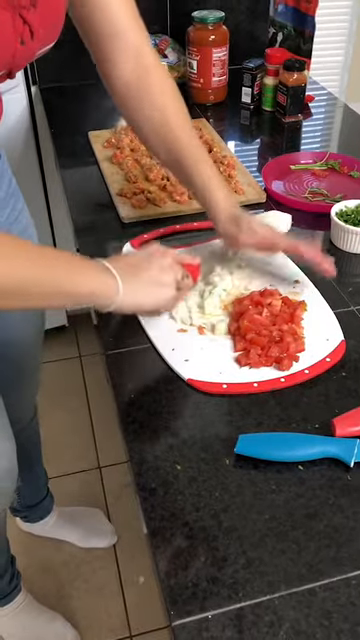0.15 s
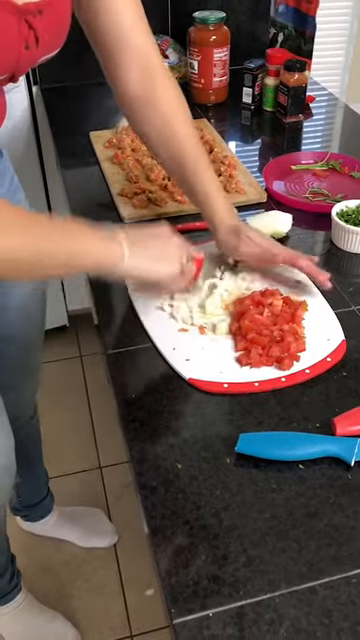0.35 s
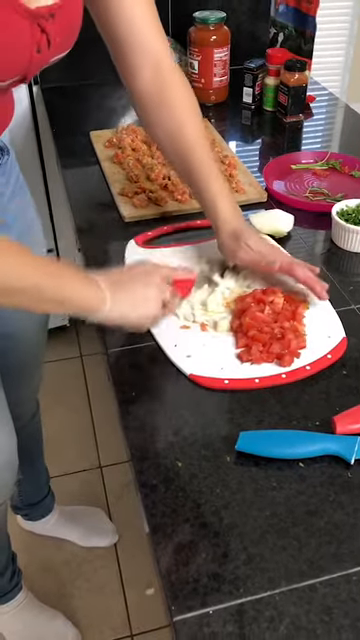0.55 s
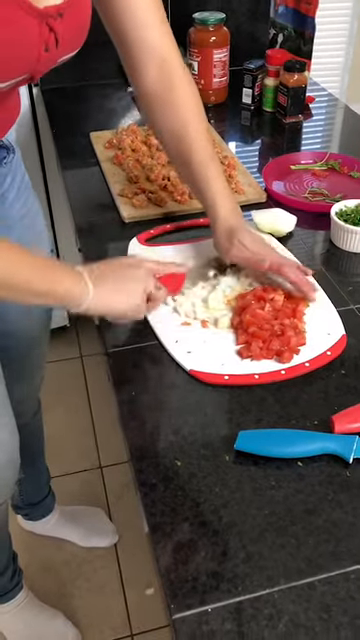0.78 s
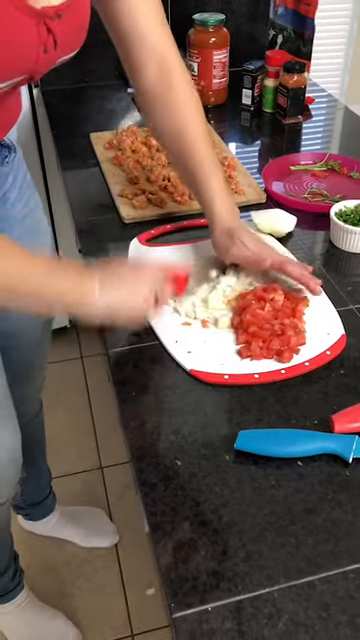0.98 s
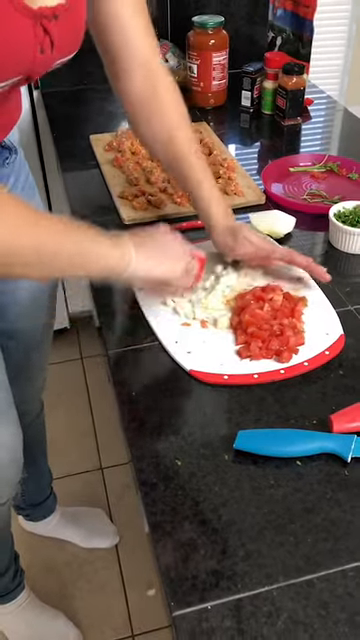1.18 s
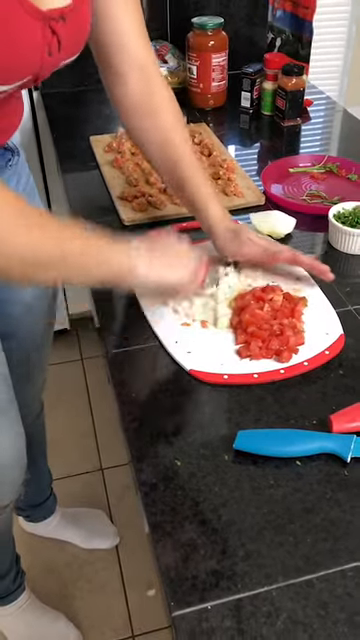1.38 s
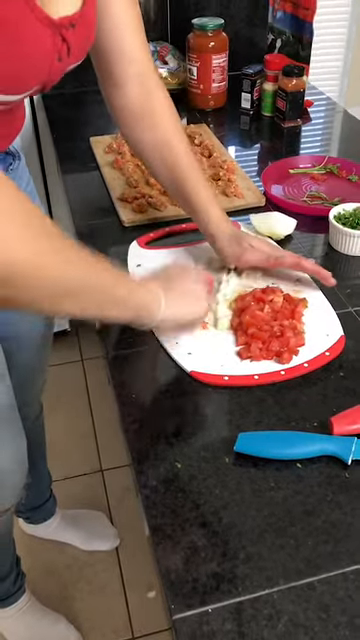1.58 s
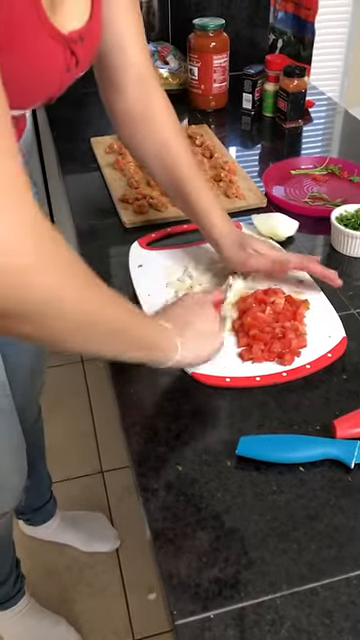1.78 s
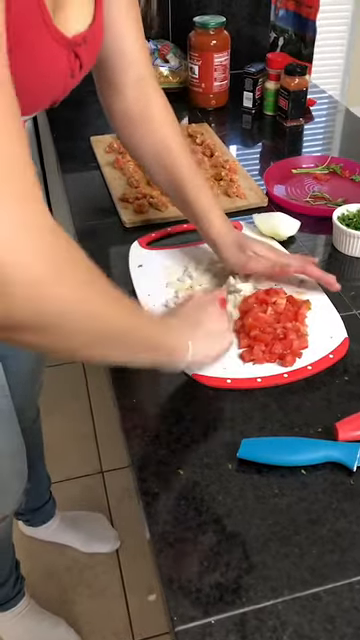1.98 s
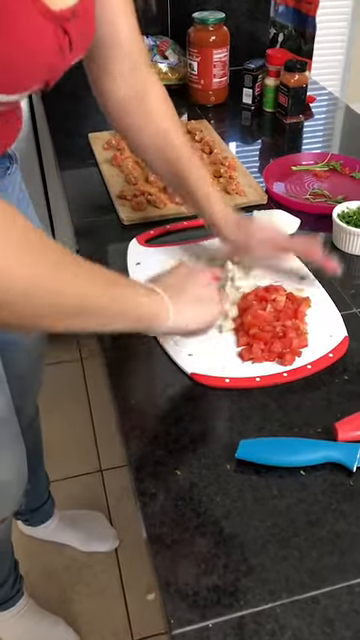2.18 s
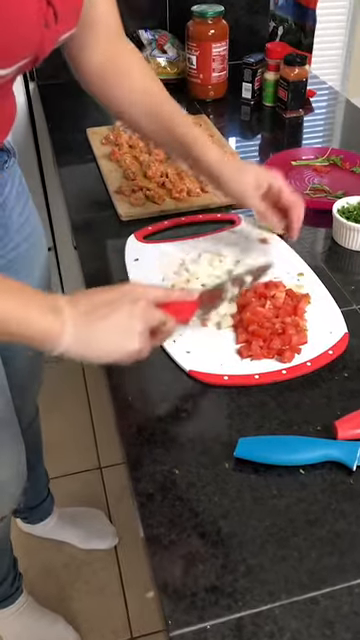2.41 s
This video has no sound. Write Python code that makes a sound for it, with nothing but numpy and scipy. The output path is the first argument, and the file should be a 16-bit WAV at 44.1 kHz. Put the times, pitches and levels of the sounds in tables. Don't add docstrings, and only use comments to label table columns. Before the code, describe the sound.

Onion is cut in crunchy strokes about four a second, the blade tapping hollow plastic, with the loudest knock near the end. Phone microphone about a metre away, short live room echo, steady fridge rumble underneath.

```python
import sys
import numpy as np
from scipy import signal
from scipy.fft import rfft, irfft
from scipy.io import wavfile
from scipy.ndimage import uniform_filter1d

SR = 44100
rng = np.random.default_rng(int(sys.argv[2]) if len(sys.argv) > 2 else 0)


def to_linear_factor(level_db):
    exponent = np.asarray(level_db, float) / 20
    return 10 ** exponent


def to_wav(s):
    ch = np.atleast_2d(s).T
    pcm = np.round(np.clip(ch, -1, 1) * 32767)
    wavfile.write(sys.argv[1], SR, pcm.astype(np.int16))


N = 108045
T = np.arange(N) / SR


def unit(x):
    return x / np.sqrt(np.mean(x ** 2))


def shade(x, table):
    hz, db = np.array(table, float).T
    f = np.arange(len(x) // 2 + 1) * SR / len(x) + 1
    gain = to_linear_factor(np.interp(np.log(f), np.log(hz), db))
    return irfft(rfft(x) * gain, len(x))


def ring(x, hz, width, times=1):
    for _ in range(times):
        x = signal.lfilter(*signal.iirpeak(hz, hz / width, fs=SR), x)
    return x


def modes(x, table):
    return sum((-1) ** k * to_linear_factor(db) * ring(x, hz, width) for k, (hz, width, db) in enumerate(table))


def walk(rate):
    k = int(SR / rate)
    targets = rng.standard_normal(N // k + 1)
    return unit(uniform_filter1d(np.repeat(targets, k), k)[:N])


def fridge():
    # frequency in Hz, level in dB per Hz.
    rumble_colour = [(18, -52), (30, -6.5), (227, -1.5), (1040, -14), (1160, -12.5), (1250, -14.5),
                     (1670, -19.5), (14400, -41.5), (16000, -40)]
    # pitch in Hz, width in Hz, level in dB.
    motor = [(65.2, 8.7, -64), (154.8, 16.4, -58.5), (298.2, 3.8, -65.5), (472.7, 9.6, -68)]
    rumble_db, drift_db_ratio, drift_hz = -53.5, 0.87, 3.83
    hum = sum(to_linear_factor(db) * unit(ring(rng.standard_normal(N), hz, width)) for hz, width, db in motor)
    rumble = unit(shade(rng.standard_normal(N), rumble_colour))
    return to_linear_factor(rumble_db) * rumble * to_linear_factor(drift_db_ratio * walk(drift_hz)) + hum


def touches():
    # start in seconds, length in seconds, level in dB, pitch in Hz, width in Hz.
    contacts = [(0.1145, .002, -57.5, 10600, 9000), (0.121, 0.014, -69, 9900, 8000),
                (0.205, 0.0016, -68, 13000, 6000), (.209, .0015, -53, 9900, 5000),
                (0.235, 0.0016, -36.5, 7060, 6000), (0.253, 0.0033, -48, 8200, 6000),
                (.501, 0.0045, -52, 10700, 7000), (0.507, 0.0011, -46, 4940, 6000),
                (0.76, 0.0018, -64, 12000, 6000), (0.768, 0.0022, -56, 8000, 12000),
                (.77, 0.0067, -49, 1770, 2000), (.827, 0.0022, -43, 7000, 5000),
                (1.033, .01, -51.5, 9000, 14000), (1.1045, 0.0016, -56, 8040, 5000),
                (1.265, 0.0049, -60, 7900, 11900), (1.294, 0.001, -40, 8800, 3960),
                (1.672, .035, -56.5, 10900, 6000), (1.678, 0.03, -55, 2400, 1300),
                (1.784, 0.0045, -45.5, 6750, 4000), (1.547, .03, -48, 4600, 2500),
                (1.984, 0.017, -66, 10900, 8000), (2.187, 0.0018, -56.5, 10000, 4000)]
    out, size = np.zeros(N), 4096
    for s, length, db, hz, width in contacts:
        grit = rng.standard_normal(size) ** 3
        shape = np.sqrt(np.sin(np.pi * np.clip(T[:size] / length, 0, 1)).clip(0))
        start = int(s * SR)
        out[start:start + size] += to_linear_factor(db) * unit(ring(grit, hz, width, times=2)) * shape
    return out


def cells(patch):
    cells_per_s, scatter_db, patchy_db = 7000, 2.5, 2
    on = rng.random(N) < cells_per_s / SR
    size = to_linear_factor(scatter_db * rng.exponential(size=N) + patchy_db * patch)
    return unit(on * rng.standard_normal(N) * size)


def stroke(column):
    # start, swell and hold in seconds, crunch in dB, board shake in dB.
    cuts = [
        (0.218, 0.021, 0.026, -46.5, -44.5),
        (0.506, 0.027, 0.023, -43.5, -41),
        (0.78, 0.0066, 0.031, -49, -46.5),
        (0.797, 0.014, 0.028, -46, -55),
        (1.026, 0.014, 0.03, -46.5, -48.5),
        (1.109, 0.0046, 0.0088, -54, -62),
        (1.268, 0.0091, 0.023, -40.5, -46),
        (1.536, 0.011, 0.027, -46.5, -49.5),
        (1.769, 0.019, 0.035, -46, -48),
        (1.992, 0.024, 0.046, -43.5, -43),
    ]
    release_s = 0.0068
    out = np.zeros(N)
    for row in cuts:
        start, swell, hold = row[:3]
        t = T - start
        rise = np.clip(t / swell, 0, 1) ** 1.42
        release = np.exp(-np.clip(t - swell - hold, 0, 1) / release_s)
        out = np.hypot(out, to_linear_factor(row[column]) * rise * release)
    return out


def onion():
    # frequency in Hz, level in dB.
    crunch_colour = [(1500, 9), (2600, -7.5), (4000, -0.5), (7000, -2), (12000, -5), (15000, -2),
                     (16000, -23)]
    # pitch in Hz, width in Hz, level in dB.
    board = [(786, 144, 3.5), (1010, 154, 8.5), (1200, 170, 0.5), (1500, 240, -8), (2000, 740, -6),
             (3240, 240, -12.5)]
    drift_db, drift_hz, cell_q = 1.84, 29.75, 2.8
    hz, db = np.array(crunch_colour, float).T
    patch = walk(200)
    crunch = np.zeros(N)
    for f in np.geomspace(1500, 15000, 11):
        level = np.interp(np.log(f), np.log(hz), db) + drift_db * walk(drift_hz)
        crunch += to_linear_factor(level) * ring(cells(patch), f, f / cell_q)
    force = cells(walk(200))
    shake = modes(force * stroke(column=4), board) / np.std(modes(force, board))
    return unit(crunch) * stroke(column=3) + shake


def burst(decay_s, size):
    x = ring(rng.standard_normal(size), 6200, 13000) * np.exp(-T[:size] / decay_s)
    return x / np.abs(x).max()


def knocks():
    # start in seconds, peak in dB, ring pitch in Hz, upper modes in dB, crack in dB.
    hits = [(.2285, -36, 945, -20, -20), (0.2434, -32, 1024, -15, -23), (0.2522, -34, 1200, 6, -20),
            (0.2551, -32.5, 1250, -12, -22), (0.2674, -32.5, 804, -25, -18), (0.5433, -30.5, 1010, -2, -20),
            (.5537, -26, 1107, -1.5, -26), (0.5568, -32.5, 1130, -30, -16), (0.784, -36.5, 1500, -10, -24),
            (0.8187, -38.5, 940, -8, -24), (1.0518, -29, 1050, -23, 0), (1.0559, -31.5, 1040, -10, -3),
            (1.0663, -34.5, 1050, -19, -18), (1.2766, -25, 1010, -8, -35), (1.563, -34.5, 1110, -3, -17),
            (1.7881, -35, 1174, 3.5, -23), (1.808, -42, 1940, 11, -10), (1.8152, -27, 1070, 3, -28),
            (1.811, -32.5, 2040, -5, -24), (1.8211, -36, 1700, -3, -24), (2.0149, -24, 1160, -5, -14),
            (2.0175, -33, 400, -18, -24), (2.0489, -18.5, 1140, -0.5, 2), (2.0541, -27, 1200, -17, -27)]
    # pitch in Hz, width in Hz, level in dB.
    upper_modes = [(2060, 1000, 14), (2700, 200, 5), (2910, 220, 11), (4100, 2700, 5)]
    ring_width_hz, ring_lag_s, crack_s = 687, 0.0005, 0.00054
    thud_hz, thud_width_hz, thud_db = 330, 335, -23.5
    out, size = np.zeros(N), 1024
    tap = signal.unit_impulse(size)
    late_tap = np.roll(tap, int(ring_lag_s * SR))
    upper = modes(tap, upper_modes)
    thud = ring(tap, thud_hz, thud_width_hz, times=2)
    for s, db, hz, upper_db, crack_db in hits:
        low = ring(late_tap, hz, ring_width_hz, times=3)
        hit = low / low.max() + to_linear_factor(upper_db) * upper / upper.max()
        hit += to_linear_factor(crack_db) * burst(crack_s, size) + to_linear_factor(thud_db) * thud / thud.max()
        start = int(s * SR)
        out[start:start + size] += to_linear_factor(db) * hit
    return out


def kitchen(x):
    # band centre in Hz, time to fall 60 dB in seconds.
    decay = [(300, 0.53), (1000, 0.6), (2000, 0.47), (4000, 0.55), (8000, 0.34), (14000, 0.12)]
    # band centre in Hz, level in dB.
    colour = [(300, -2.5), (1000, -3.5), (2000, -1), (4000, -5.5), (8000, -2.5), (14000, 2)]
    tail_db, gap_s, flutter_db = -7, 0.0044, 2.5
    early_s, early_db = 0.023, -15.5
    t = T[:SR]
    tail = np.zeros(SR)
    for (hz, t60), (_, db) in zip(decay, colour):
        band = ring(rng.standard_normal(SR), hz, 0.92 * hz)
        tail += to_linear_factor(db) * band * 1000. ** (-t / t60) * to_linear_factor(flutter_db * walk(40)[:SR])
    early = rng.standard_normal(SR) * np.exp(-t / early_s)
    echo = to_linear_factor(tail_db) * unit(tail) + to_linear_factor(early_db) * unit(early)
    echo = echo * (t > gap_s) / np.sqrt(SR)
    return signal.fftconvolve(x, echo)[:N]


def scene():
    near = touches() + onion() + knocks()
    return (near + kitchen(near) + fridge())[None]


def band_limit(x):
    return signal.sosfilt(signal.butter(12, 16860, fs=SR, output="sos"), x)


def record(dry):
    low_hz, top_hz = 54, 15750
    mix = signal.sosfilt(signal.butter(4, low_hz, "high", fs=SR, output="sos"), dry)
    mix = signal.sosfilt(signal.ellip(10, 0.3, 60, top_hz, fs=SR, output="sos"), mix)
    return band_limit(mix)


dry = scene()
out = record(dry)
to_wav(out)
```